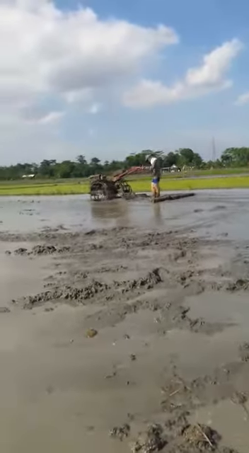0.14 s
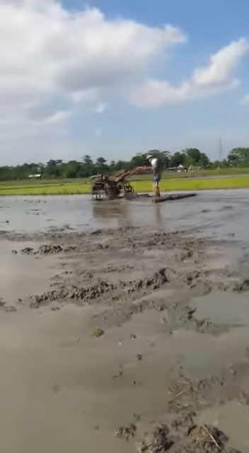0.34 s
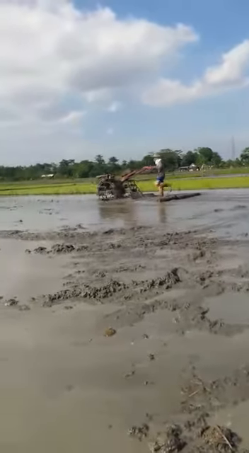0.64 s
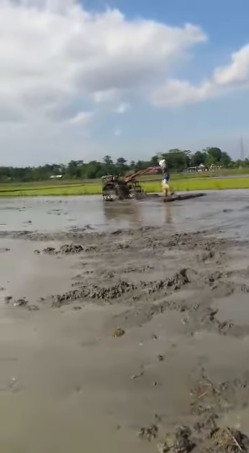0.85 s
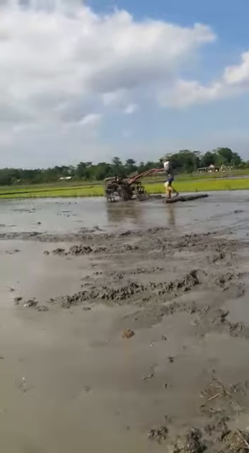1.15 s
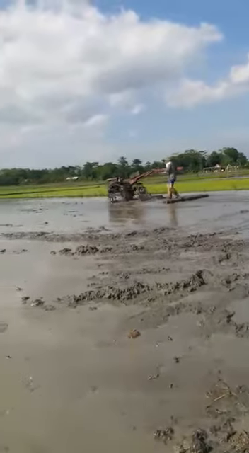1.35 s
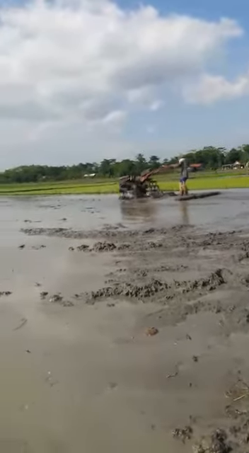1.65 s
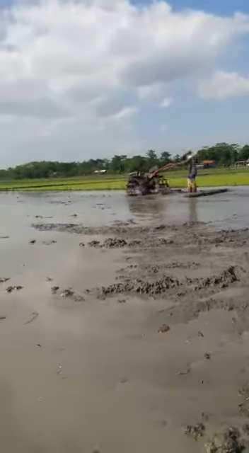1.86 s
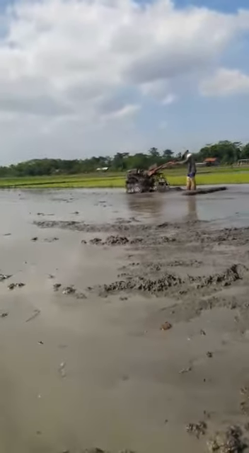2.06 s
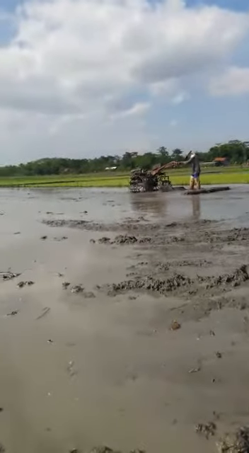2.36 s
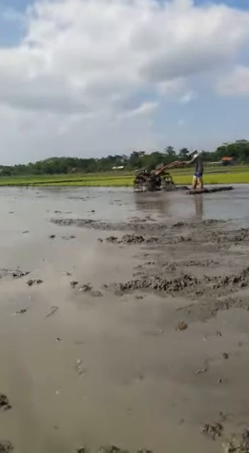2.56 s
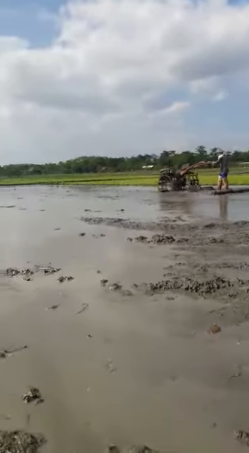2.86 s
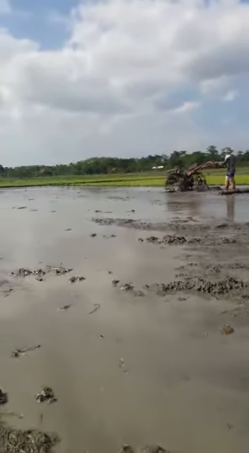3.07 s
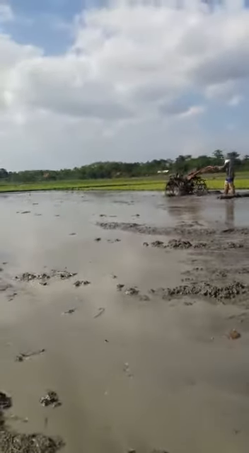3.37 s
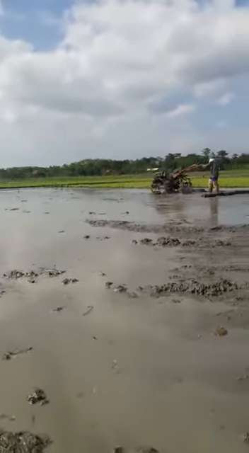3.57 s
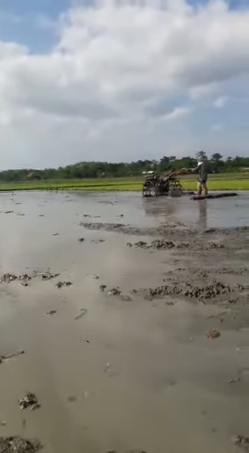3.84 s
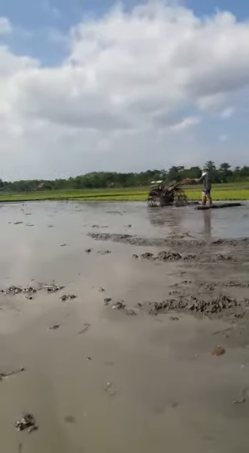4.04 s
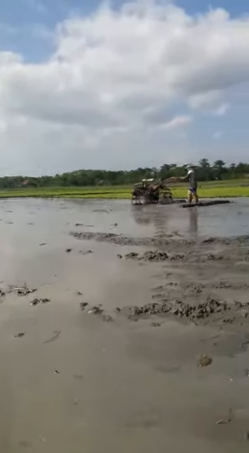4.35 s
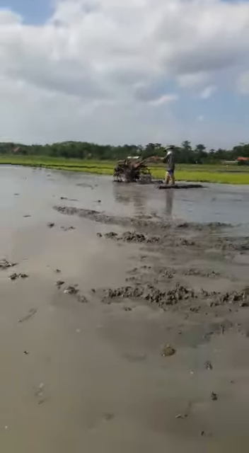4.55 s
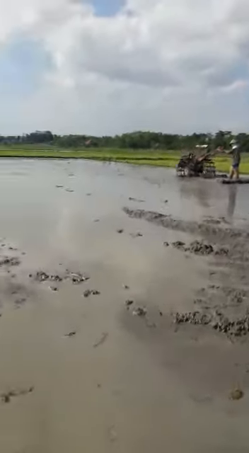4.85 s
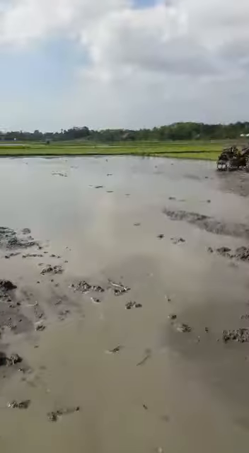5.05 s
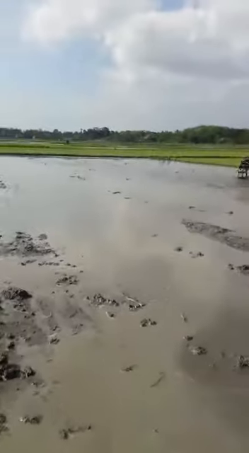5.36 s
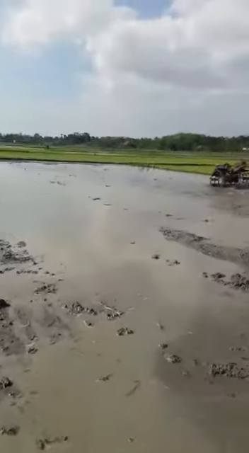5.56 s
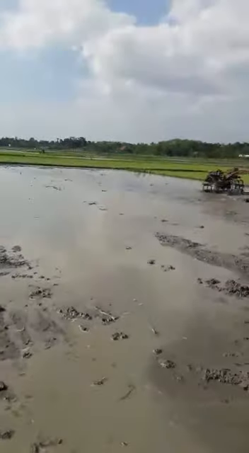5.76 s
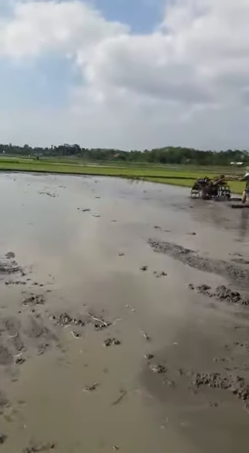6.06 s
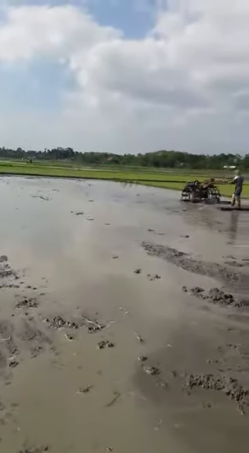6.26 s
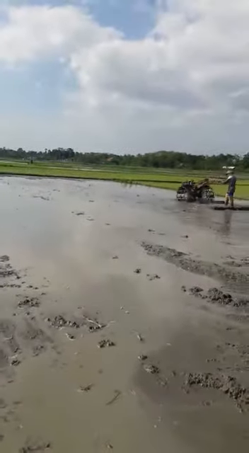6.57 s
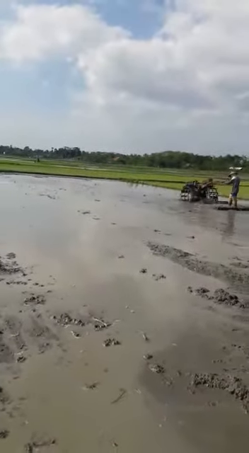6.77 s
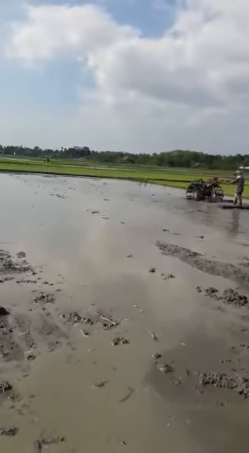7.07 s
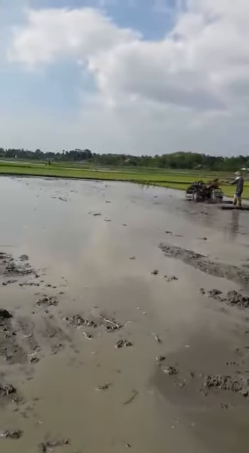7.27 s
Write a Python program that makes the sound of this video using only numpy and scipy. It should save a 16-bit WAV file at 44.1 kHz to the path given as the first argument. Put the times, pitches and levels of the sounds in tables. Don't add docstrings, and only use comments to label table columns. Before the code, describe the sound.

A single-cylinder diesel tiller chugs rapidly and evenly across a flooded field, metal knocking and rattling, while wind gusts buffet the phone microphone.

```python
import sys
import numpy as np
from scipy import signal
from scipy.fft import rfft, irfft, next_fast_len
from scipy.io import wavfile
from scipy.ndimage import uniform_filter1d, map_coordinates

SR = 44100
rng = np.random.default_rng(int(sys.argv[2]) if len(sys.argv) > 2 else 0)


def store_wav(level_fs):
    pcm = np.round(np.clip(np.atleast_2d(level_fs), -1, 1) * 32767)
    wavfile.write(sys.argv[1], SR, pcm.T.astype(np.int16))


def linear_from_db(decibels):
    return 10 ** (np.asarray(decibels, float) / 20)


N = 326781
CYCLE_S, FIRST_S = 0.0884179, 0.00445


def unit(x):
    return x / np.sqrt(np.mean(x ** 2) + 1e-20)


def curves(rows):
    s, *columns = np.transpose(rows)
    return [np.interp(np.arange(N) / SR, s, column) for column in columns]


def wobble(rate_hz):
    knots = rng.standard_normal(int(N * rate_hz / SR) + 4)
    return map_coordinates(knots, [np.arange(N) * rate_hz / SR])


def filtered(x, response):
    size = next_fast_len(N + SR // 2)
    return irfft(rfft(x, size) * response(np.fft.rfftfreq(size, 1 / SR)), size)[:N]


def coloured(x, spectrum):
    f, db = np.transpose(spectrum)

    def response(hz):
        return linear_from_db(np.interp(np.log(hz + 1), np.log(f), db, left=-120, right=-120))
    return unit(filtered(x, response))


def ringing(x, modes):
    def response(f):
        total = 0
        for k, (hz, width, db) in enumerate(modes):
            mode = 1j * f * width / (hz * hz - f * f + 1j * f * width)
            total = total + (-1) ** k * linear_from_db(db) * mode
        return total
    return unit(filtered(x, response))


def rear_share():
    # time_s, share_seen_from_rear
    turn = [(0, 0), (2.5, 0.35), (4.3, 0.39), (5.5, 1), (7.41, 0.97)]
    return np.clip(curves(turn)[0], 0, 1)


def facing(side_db, rear_db):
    return side_db + (rear_db - side_db) * rear_share()


def nearness_db():
    # time_s, level_db
    near = [(0, 2.5), (1.5, 1), (3, -1), (4.5, -1), (6, -1), (7.4, -0.5)]
    return curves(near)[0]


def beats(after_s, scatter_db, jitter_s):
    # time_s, delay_ms
    lag = [(0, -1.4), (.53, -.9), (.85, 0), (1.33, 1.8), (1.6, .9), (2.05, -1.8), (2.45, -.6), (3.2, 1.15),
           (3.8, 1), (4.05, .4), (4.55, -1.5), (4.8, -1.8), (5.28, -3.3), (5.7, -1), (6.11, .2), (6.7, .55),
           (7.17, 1.9), (7.41, 1.6)]
    even_s = FIRST_S + CYCLE_S * np.arange(-1, int(N / SR / CYCLE_S) + 2)
    chance = rng.standard_normal((len(even_s), 2))
    drift_s = np.interp(even_s, *np.transpose(lag)) / 1000
    at = np.round((even_s + drift_s + after_s + jitter_s * chance[:, 0]) * SR).astype(int)
    keep = (at >= 0) & (at < N)
    return np.bincount(at[keep], linear_from_db(scatter_db * chance[keep, 1]), N)


def burst(after_s, rise_s, fall_s, scatter_db):
    alike = 0.38
    t = np.arange(SR // 16) / SR
    shape = (1 - np.exp(-t / rise_s)) ** 2 * np.exp(-t / fall_s)
    both = [shape, shape * rng.standard_normal(len(t))]
    clicks = beats(after_s, scatter_db, jitter_s=0.0003)
    fresh, same = signal.oaconvolve(clicks[None], both, axes=1)[:, :N]
    return np.sqrt(1 - alike) * fresh * rng.standard_normal(N) + np.sqrt(alike) * same


def struck(firing, blows, modes):
    force = 0
    for delay_s, size in blows:
        force = force + size * np.pad(firing, (round(delay_s * SR), 0))[:N]

    def soften(hz):
        return 1 / (1 + (1j * hz / 3600) * 1.74 - (hz / 3600) ** 2) ** 2
    return ringing(filtered(force, soften), modes)


def knock():
    # time_s, burn_harshness_db, piston_slap_db
    load = [(0, 0, -22), (.6, 1, 4), (1.4, 4.5, 9), (1.7, 1.5, 10.5), (2.2, 0, 10.5), (2.75, 1.5, 11),
            (3.3, -1, 9), (4.05, -2, 8.5), (4.35, -0.5, 3.5), (4.85, 1.5, 6.5), (5.15, 5.5, 1.5),
            (5.4, 7, 10), (5.9, -4.5, 0.5), (6.44, 6, 8), (6.9, 0, 2), (7.23, 0.5, 9.5), (7.41, 11, -1)]
    # pitch_hz, width_hz, level_db
    block_modes = [(838, 30, 4.5), (1027, 61, -4.5), (1370, 43, 14.5)]
    # pitch_hz, width_hz, level_db
    head_modes = [(1036, 40, -5.5), (1680, 80, 2.5), (1765, 65, 4.5), (1985, 40, 2)]
    # pitch_hz, width_hz, level_db
    cover_modes = [(2430, 45, 0), (2510, 80, -1), (2715, 70, 1), (2840, 110, -.5), (2950, 70, -4),
                   (3300, 45, -5), (3375, 45, -5)]
    # pitch_hz, level_db_per_hz
    crack_colour = [(800, -8), (1200, -6), (1490, -14), (1750, 4), (2000, 0), (2250, -12), (2450, 5),
                    (2800, 7), (3200, -8), (3380, -1), (3700, -17), (7000, -19), (9000, -34), (15000, -48)]
    burn_db, slap_db = curves(load)
    block_db = facing(-49, -44) + slap_db
    head_db = facing(-37, -48.5) + burn_db
    cover_db = facing(-36.5, -57) + burn_db

    firing = beats(-0.0226, scatter_db=1.34, jitter_s=0.00015)
    block = struck(firing, [(0, 0.12), (0.0036, 0.61), (0.0068, 1)], block_modes)
    head = struck(firing, [(0, 1), (0.0029, 0.75), (0.0064, 0.15)], head_modes)
    cover = struck(firing, [(0, 1), (0.0025, 0.8), (0.0047, 0.3), (0.0075, 0.1)], cover_modes)
    flare = burst(-0.0238, rise_s=0.0004, fall_s=0.005, scatter_db=1.2)
    crack = linear_from_db((head_db + cover_db) / 2 - 6) * coloured(flare, crack_colour)

    hidden_db = 3 * np.sin(np.pi * rear_share())
    total = linear_from_db(block_db - 4.0) * block + crack
    total += linear_from_db(head_db - 3.0 - hidden_db) * head + linear_from_db(cover_db - 3.0) * cover
    detour = np.roll(total, round(0.0006 * SR))
    return np.where(np.arange(N) > 5.0 * SR, detour, total)


def pipes():
    # pitch_hz, level_db, fade_by_60_db_s, push_or_pull (+1 or -1)
    strokes = [ (185, -13.5, 0.029, 1), (102, -24, 0.09, -1), (986, -33, 0.031, 1), (259, -14, 0.029, -1),
               (829, -25.5, 0.02, -1), (276, -21, 0.026, 1), (160.7, -22, 0.11, -1), (312, -31.5, 0.15, -1),
               (516, -24, 0.09, -1), (108, -22, 0.055, -1), (118, -30, 0.08, 1), (520, -35, 0.035, 1)]
    stroke_s = [-.0047, -.005, -.003, .0226, .0226, .0477, .0495, .0502, -.0247, .0054, .0432, .02]
    t = np.arange(SR // 5) / SR
    onset = 1 - np.exp(-t / 0.00072)
    total = np.zeros(N)
    for after_s, (hz, db, t60, push) in zip(stroke_s, strokes):
        ring = np.sign(push) * linear_from_db(db - 60 * t / t60) * np.sin(2 * np.pi * hz * t) * onset
        total += signal.oaconvolve(beats(after_s, scatter_db=1.2, jitter_s=0.0001), ring)[:N]
    return linear_from_db(nearness_db()) * total


def valves():
    # after_exhaust_opens_s, fall_s, level_db
    puffs = [
        (-.0045, 0.0029, -50),
        (0.0236, 0.0017, -51),
    ]
    # pitch_hz, width_hz, level_db
    shell = [(833, 100, -2), (1097, 139, -0.5)]
    barks = np.zeros(N)
    for after_s, fall_s, db in puffs:
        barks += linear_from_db(db) * ringing(burst(after_s, 0.0008, fall_s, scatter_db=1), shell)
    return linear_from_db(nearness_db()) * barks


def voiced(x, hz, scatter_db):
    # time_s, pitch_hz, level_db
    accents = [(0, 2810, 9), (0, 3790, 7), (0, 5240, 6), (0.09, 6120, 18), (0.36, 6120, 13),
               (0.45, 3790, 7), (0.62, 5240, 5), (0.71, 6120, 11), (0.98, 5240, -11), (1.07, 6120, 4),
               (1.15, 5240, 3), (1.24, 6120, 11), (1.24, 9000, 5), (1.51, 9000, 7), (1.6, 6120, -8),
               (1.68, 5240, 6), (1.68, 6120, -13), (1.86, 3790, -8), (1.95, 5240, 10), (1.95, 6120, 10),
               (2.04, 5240, -5), (2.13, 6120, -8), (2.3, 9000, 7), (2.39, 5240, 4), (3.01, 3790, 3),
               (3.01, 5240, -5), (3.19, 3790, 5), (3.19, 5240, 3.5), (3.28, 5240, 2.5), (3.36, 3790, -14),
               (3.36, 5240, -7.5), (3.98, 5240, 4), (4.07, 5240, 3.5), (4.16, 6120, 10), (4.43, 3790, -14),
               (4.51, 5240, -15), (4.51, 6120, 9), (4.6, 6120, 8), (4.78, 5240, 6.5), (4.87, 9000, -14),
               (5.04, 6120, 13.5), (5.04, 9000, 4), (5.22, 5240, -10), (5.57, 3790, 4), (5.57, 5240, 2),
               (5.66, 3790, 4), (5.75, 3790, 4), (6.19, 6120, 13.5), (6.28, 6120, 14.5), (6.28, 9000, 4),
               (6.37, 3790, 10.5), (6.46, 3790, 9), (6.55, 5240, -4), (6.64, 5240, -11), (6.64, 6120, -13),
               (6.9, 6120, 6), (6.99, 5240, -4), (7.08, 3790, 7.5), (7.17, 9000, 6), (7.25, 3790, 10)]
    cycle = np.floor((np.arange(N) / SR - FIRST_S + 0.03) / CYCLE_S).astype(int)
    db = scatter_db * rng.standard_normal(cycle[-1] + 1)
    for s, accent_hz, accent_db in accents:
        if abs(np.log(min(hz, 9000) / accent_hz)) < 0.07:
            db[round((s - FIRST_S) / CYCLE_S)] += accent_db
    stroke_size = np.sqrt(np.bincount(cycle, x ** 2) + 1e-9)
    return unit(x / stroke_size[cycle]) * linear_from_db(db)[cycle]


def spit():
    # time_s, strength_db, lean_to_high_whistle_db
    jet = [(0, -47.5, -4), (.5, -47, -3.5), (1.1, -43.5, 1.5), (1.6, -49.5, 1.5), (2.1, -45, 2.5),
           (2.7, -48, 1), (3.3, -42.5, 3.5), (3.9, -47.5, 0), (4.4, -46, -0.5), (5, -47.5, 0),
           (5.6, -44, 2.5), (6, -48.5, 0.5), (6.4, -47.5, 0.5), (6.9, -45.5, -1.5), (7.41, -46, 8.5)]
    # pitch_hz, width_hz, level_db
    whistles = [
        [(2810, 300, 0.5), (3780, 330, 0)],
        [(5253, 230, 4), (6120, 94, -6)],
    ]
    # pitch_hz, width_hz, level_db
    hiss = [(8670, 300, 5.2), (9240, 450, 14), (10250, 400, 14.8), (11400, 530, 16.4), (12600, 1400, 6.8)]
    # level_over_jet_db, answer_to_lean
    jet_voices = [
        (-2, -1.05),
        (-4, 1),
        (-11, -0.41),
    ]
    jet_db, lean_db = curves(jet)
    total = np.zeros(N)
    for (db, answer), modes in zip(jet_voices, [*whistles, hiss]):
        voices = np.zeros(N)
        for hz, width, mode_db in modes:
            puff = burst(-0.0034, rise_s=0.0012, fall_s=0.003, scatter_db=-3)
            voices += linear_from_db(mode_db) * voiced(ringing(puff, [(hz, width, 0)]), hz, scatter_db=1.5)
        total += linear_from_db(jet_db + db + answer * lean_db) * unit(voices)
    total = filtered(total, lambda hz: 1 / (1 + (hz / 12500) ** 6))
    spray = burst(-0.0029, rise_s=0.0011, fall_s=0.0034, scatter_db=4.0)
    return total + linear_from_db(jet_db - 27) * coloured(spray, [(7000, -20), (12500, 7), (15800, -9)])


def shaken(db, side, rear, steady, grain_db, shake):
    share = rear_share()
    chatter = linear_from_db(grain_db * wobble(160)) * (steady + shake)
    from_side, from_rear = rng.standard_normal((2, N)) * chatter
    mixed = np.sqrt(1 - share) * coloured(from_side, side) + np.sqrt(share) * coloured(from_rear, rear)
    return linear_from_db(db + 2.0) * mixed


def rattle():
    # pitch_hz, level_db_per_hz
    tin_side = [(240, -37), (400, -6.5), (513, 1.2), (651, -8.5), (747, -2.5), (882, -16), (1050, -2.5),
                (1400, -18.5), (1500, -17.5), (1730, -11.5), (2250, -18.5), (2420, -12.5), (2760, -12),
                (3140, -22.5), (3600, -66), (4680, -64), (7920, -120)]
    tin_rear = [(240, -14), (400, -8.5), (508, 3), (645, -20), (754, -15), (866, -8.5), (1130, -13),
                (1330, -10), (1590, -17), (1790, -15), (2050, -20), (2360, -19), (2910, -31), (3140, -30.5),
                (3600, -23.5), (4680, -44), (7920, -120)]
    # pitch_hz, level_db_per_hz
    fizz_side = [(2600, 6), (3100, -14), (3750, -11), (4200, 5), (5000, -4.5), (5500, -4), (6500, -7),
                 (7400, -3.5), (8000, -14), (8700, -8), (9500, -17), (11500, -17), (13000, -25),
                 (15800, -33)]
    fizz_rear = [(2600, -12), (3100, 1), (3700, -1.5), (4200, 1.5), (5200, 3), (6500, -3), (7500, -10),
                 (8000, -20), (9000, -14.5), (10500, -11), (12400, -26), (15800, -34)]
    t = np.arange(SR // 10) / SR
    firing, blow, shut, gulp = [beats(s, 2, 0.001) for s in (-0.022, -0.0031, 0.023, 0.049)]
    kicks = 1.04 * firing + 0.5 * blow + 0.27 * shut + 0.09 * gulp
    tin_shake = signal.oaconvolve(kicks, np.exp(-t / 0.017))[:N]
    fizz_shake = signal.oaconvolve(blow + 0.26 * firing, np.exp(-t / 0.022))[:N]
    tin_db = facing(-37, -35.5) + nearness_db()
    tin = shaken(tin_db, tin_side, tin_rear, steady=0.42, grain_db=1.3, shake=tin_shake)
    sizzle = shaken(facing(-55.5, -55), fizz_side, fizz_rear, steady=0.7, grain_db=1.1, shake=fizz_shake)
    return tin, sizzle


def splash():
    # start_s, length_s, level_db
    splashes = [(1.726, 0.13, -42), (4.12, 0.31, -42), (4.7, 0.1, -44), (4.982, 0.087, -43.5)]
    # pitch_hz, level_db_per_hz
    spray = [(600, -39), (1500, 9), (3000, 1), (7000, -12), (12000, -26), (16000, -26)]
    t = np.arange(N) / SR
    swell = np.zeros(N)
    for s, length, db in splashes:
        progress = np.clip((t - s) / length, 0, 1)
        swell += linear_from_db(db) * np.sin(np.pi * progress ** 1.14) ** 0.75
    drops = rng.standard_normal(N) * linear_from_db(1.6 * wobble(280))
    return swell * coloured(drops, spray)


def mirrored(x):
    # time_s, delay_ms, strength
    water = [(0, .56, .4), (2.6, .56, .4), (3.2, .555, .6), (3.95, .555, .6), (4.15, .56, .25),
             (4.9, .58, .15), (5.1, .74, .2), (5.7, .81, .3), (6.3, .85, .5), (7.41, .85, .5)]
    # time_s, delay_ms, strength (negative = upside down)
    hand = [(0, 1.07, .2), (2.2, 1.07, .25), (2.6, .77, .15), (3.3, .73, .3), (4, .73, .3), (4.3, .75, 0),
            (5.1, .88, -.1), (5.4, .88, -.3), (6, .74, -.3), (7.41, .73, -.35)]
    total, power = x.copy(), 1
    for delay_ms, strength in (curves(water), curves(hand)):
        late = (delay_ms + 0.005 * wobble(6)) * SR / 1000
        echo = map_coordinates(x, [np.arange(N) - late])
        total = total + strength * filtered(echo, lambda hz: 1 / (1 + (hz / 17000) ** 2))
        power = power + strength ** 2
    return total / np.sqrt(power)


def gusts():
    # start_s, length_s, level_db
    gust_rows = [(-.05, 0.3, -24.5), (0.163, 0.61, -27.5), (0.81, 0.29, -28), (1.211, 0.15, -22),
                 (1.343, 0.65, -38), (1.754, 0.31, -30.5), (2.285, 0.35, -33), (2.636, 0.2, -30),
                 (2.99, 0.83, -39), (3.576, 0.27, -31), (4.013, 0.23, -29.5), (4.237, 0.18, -27.5),
                 (4.552, 0.097, -27), (4.778, 0.12, -25.5), (5.067, 0.16, -17), (5.21, 0.048, -16.5),
                 (5.326, 0.12, -21), (5.471, 0.18, -26), (5.636, 0.096, -23.5), (5.764, 0.052, -24.5),
                 (5.819, 0.28, -21), (6.03, 0.22, -22), (6.346, 0.098, -20), (6.456, 0.12, -21.5),
                 (6.547, 0.15, -20.5), (6.693, 0.14, -16), (6.833, 0.16, -23.5), (6.971, 0.11, -19.5),
                 (7.075, 0.022, -25), (7.379, 0.076, -25)]
    t = np.arange(N) / SR
    swell = linear_from_db(-38.5)
    for s, length, db in gust_rows:
        rise = (t - s) / (0.18 * length)
        fall = (s + length - t) / (0.34 * length)
        swell = swell + linear_from_db(db) * np.clip(np.minimum(rise, fall), 0, 1)
    return 20 * np.log10(swell)


def wind():
    # pitch_hz, level_db_per_hz
    buffet_colour = [(13, -60), (25, -33), (98, 2), (172, 0), (261, -7), (315, -4), (434, -9),
                     (1160, -34.5), (1320, -26), (2000, -66), (2600, -83), (4400, -120)]
    # pitch_hz, level_db_per_hz
    rumble_colour = [(15, -45), (30, -34), (55, -2.5), (90, 0), (140, 0), (220, -19.5)]
    # time_s, level_db
    deep = [(0, 3), (.5, -5), (2, -4.5), (3.6, -4), (4.4, 5), (4.9, -1), (5.6, 2), (6.2, -2), (7.41, 2)]
    # time_s, peak_db, pitch_hz, push_or_pull (+1 or -1)
    pops = [(.108, -7, 170, 1), (.115, -5, 150, -1), (1.267, -11.5, 265, -1), (5.122, -8, 172, 1),
            (5.145, -2, 178, -1), (5.173, -1, 234, 1), (5.246, -11, 220, -1), (5.365, -5, 159, -1),
            (5.382, -5.5, 163, 1), (5.685, -7, 229, -1), (5.842, -5.5, 140, 1), (5.849, -7.5, 140, 1),
            (5.867, -8, 140.3, -1), (5.8885, -2, 187, 1), (5.904, -5.5, 436, -1), (5.9362, -4.5, 199, -1),
            (5.968, -4.5, 137, -1), (6.0147, -0.5, 397, 1), (6.072, -7, 116, -1), (6.132, -8, 165, -1),
            (6.384, -5, 280, -1), (6.552, -2.5, 330, 1), (6.611, -4.5, 226, 1), (6.634, -2.5, 305, 1),
            (6.662, -7, 244, 1), (6.741, -6, 173, 1), (6.763, -6, 307, 1), (6.784, -2.5, 312, 1),
            (7.007, -4.5, 303, 1), (7.029, -8, 277, 1), (7.0445, -6.5, 400, 1), (7.3958, -9, 244, -1)]
    # time_s, peak_db, pitch_hz, push_or_pull (+1 or -1)
    swings = [(0.026, -12, 262, -1), (0.128, -13, 158, 1), (0.166, -11.5, 198, -1), (0.223, -12.5, 265, -1),
              (0.293, -14, 230, -1), (0.483, -11, 255, 1), (0.567, -13, 307, 1), (0.872, -17, 250, 1),
              (0.886, -12.5, 211, -1), (0.956, -16, 189, 1), (1.278, -10, 244, -1), (1.885, -15.5, 243, 1),
              (4.585, -19, 234, -1), (4.828, -17.5, 189, -1), (5.233, -12.5, 167, -1),
              (5.399, -13.5, 150, 1), (5.406, -16, 212, 1), (5.694, -17, 220, -1), (5.879, -4.5, 131, 1),
              (5.987, -6.5, 190, 1), (6.174, -11.5, 210, -1), (6.404, -9.5, 210, -1), (6.412, -14, 242, -1),
              (6.478, -10.5, 230, -1), (6.485, -18, 180, -1), (6.498, -12, 230, -1), (6.519, -12, 230, 1),
              (6.558, -8, 200, 1), (6.627, -2.5, 210, 1), (6.708, -11, 187, 1), (6.722, -12, 197, -1),
              (6.752, -6.5, 197, -1), (6.774, -9.5, 222, 1), (6.793, -19, 210, 1), (6.827, -13, 192, -1),
              (6.852, -10, 171, 1), (6.912, -9.5, 152, -1), (6.925, -8.5, 286, -1), (6.946, -11.5, 240, -1),
              (6.968, -14, 199, -1), (6.996, -9, 270, -1), (7.104, -12.0, 189, 1)]
    # time_s, peak_db, push_or_pull (+1 or -1)
    snaps = [(.1139, -20, 1), (.1787, -30, -1), (.4453, -23, 1), (.5314, -21, -1), (1.2691, -17, 1),
             (5.1471, -12, 1), (5.172, -15, -1), (5.1768, -12, 1), (5.8421, -17, 1), (5.8509, -17, 1),
             (5.8952, -19, -1), (6.0144, -12, 1), (6.3902, -24, -1), (6.4089, -18, -1), (6.5519, -13, 1),
             (6.5593, -13.5, -1), (6.6246, -25, -1), (6.6341, -15.5, 1), (6.728, -25, 1), (6.7726, -17, 1),
             (6.7916, -22, 1), (6.944, -19, 1), (6.956, -23, 1), (7.008, -22, -1), (7.0437, -16, -1)]
    buffet_db = gusts()
    lumps_db = np.clip((buffet_db + 40) / 20, 0.3, 1) * 2 * wobble(45)
    raw = coloured(linear_from_db(lumps_db + 3.6 * wobble(200)) * rng.standard_normal(N), buffet_colour)
    dull = filtered(raw, lambda hz: 1 / (1 + (hz / 330) ** 4))
    force = np.clip((buffet_db + 29) / 10, 0, 1)
    total = linear_from_db(buffet_db + 0.5) * (dull + force * (raw - dull))

    slow_power = uniform_filter1d(linear_from_db(2 * buffet_db), int(0.25 * SR))
    slow_db = 10 * np.log10(np.abs(slow_power) + 1e-9)
    rumble_db = -33 + curves(deep)[0] + 0.9 * (slow_db + 26.5) + 0.68 * wobble(11.0)
    total += linear_from_db(rumble_db) * coloured(rng.standard_normal(N), rumble_colour)

    reach = SR // 50
    t = np.arange(-reach, reach) / SR
    edge = (1 - (50 * t) ** 4) ** 2
    hush = 1 - 0.58 * np.exp(-(t / 0.0046) ** 2)
    for s, *_ in [*pops, *swings]:
        part = total[round(s * SR) - reach:][:len(t)]
        part *= hush[:len(part)]
    for rows, sharp in ((pops, 0.6), (swings, 0.25)):
        for s, db, hz, push in rows:
            fade = edge * np.exp(-(np.hypot(t * hz, 0.08) - 0.08) * np.where(t < 0, 2.5, 0.65))
            spike = np.exp(-(t / np.where(t < 0, 0.0004, 0.0007)) ** 2)
            spike = sharp * min(hz / 300, 1.2) ** 0.27 * spike
            swing = (np.cos(2 * np.pi * hz * t) * fade + spike) / (1 + sharp / 2)
            part = total[round(s * SR) - reach:][:len(t)]
            part += (np.sign(push) * linear_from_db(db - 1.0) * swing)[:len(part)]
    snap = np.cos(2 * np.pi * 694 * t) * np.exp(-(t / 0.0008) ** 2)
    for s, db, push in snaps:
        part = total[round(s * SR) - reach:][:len(t)]
        part += (np.sign(push) * linear_from_db(db) * snap)[:len(part)]
    return total


def scene():
    tin, sizzle = rattle()

    def water_dip(hz):
        return (655 ** 2 - hz ** 2 + 1j * hz * 50) / (655 ** 2 - hz ** 2 + 1j * hz * 170)
    low = filtered(pipes() + knock() + valves() + tin, water_dip)
    far = low + mirrored(spit() + sizzle) + splash()
    band = filtered(far, lambda hz: np.exp(-((hz - 1060) / 100) ** 2))
    shade = 0.84 * np.exp(-((np.arange(N) / SR - 4.53) / 0.34) ** 4)
    return (far - shade * band + wind())[None]


def band_limit(x):
    return signal.sosfilt(signal.butter(12, 15760, fs=SR, output="sos"), x)


def record(dry):
    # pitch_hz, level_db_per_hz
    self_noise = [(2000, -20), (6000, 5), (15800, 7)]
    x = dry[0] + linear_from_db(-77.5) * coloured(rng.standard_normal(N), self_noise)
    x = filtered(x, lambda hz: (1j * hz / (34 + 1j * hz)) ** 3)
    x = x / (1 + np.abs(x / 1.1) ** 6) ** (1 / 6)
    mix = filtered(x, lambda hz: hz < 15760)[None]
    return band_limit(mix)


dry = scene()
out = record(dry)
store_wav(out)
```